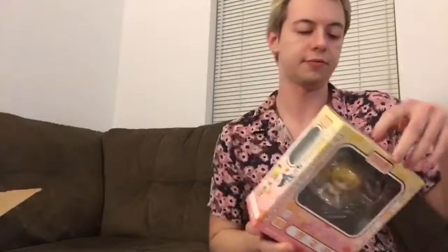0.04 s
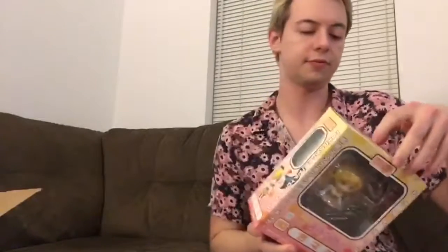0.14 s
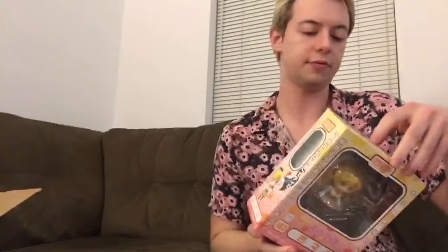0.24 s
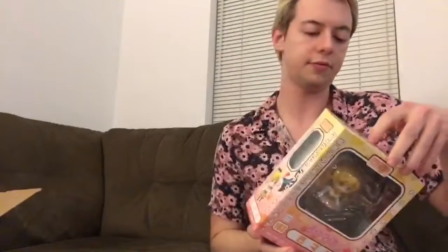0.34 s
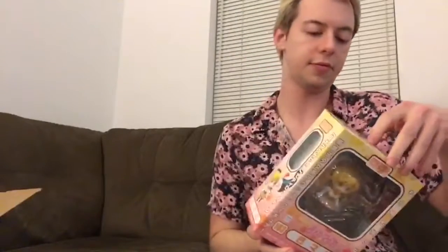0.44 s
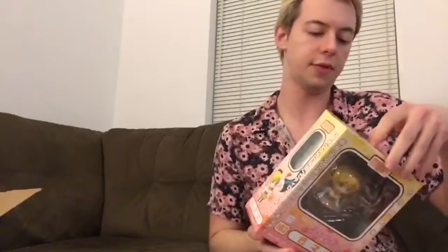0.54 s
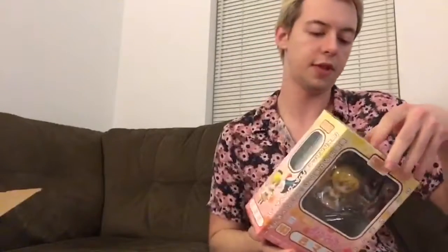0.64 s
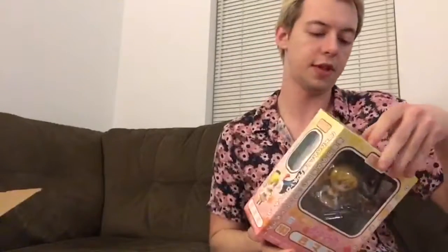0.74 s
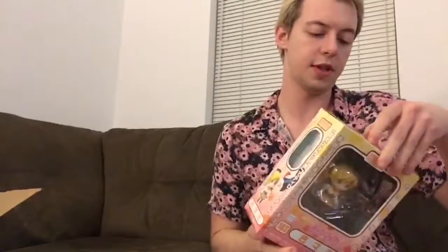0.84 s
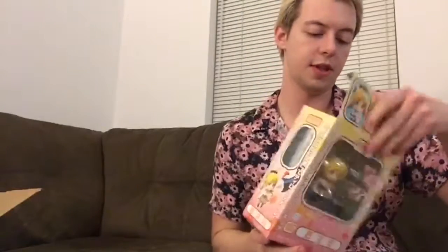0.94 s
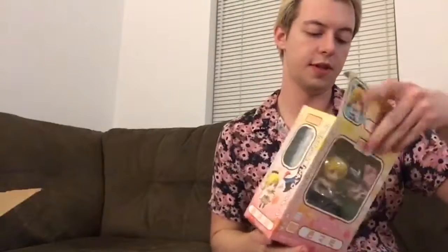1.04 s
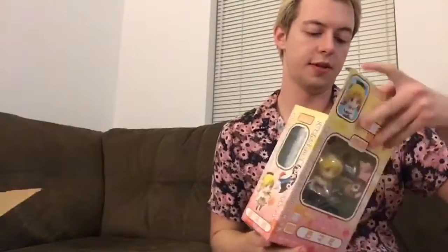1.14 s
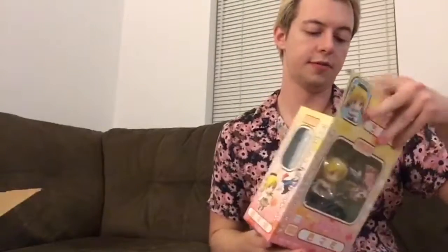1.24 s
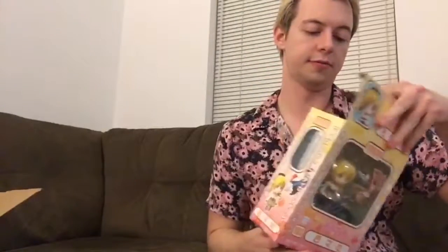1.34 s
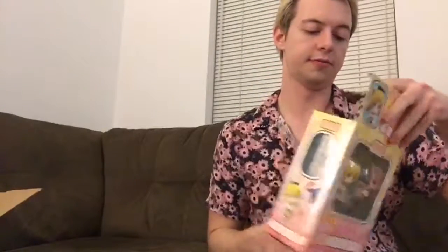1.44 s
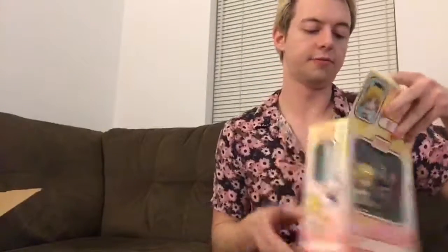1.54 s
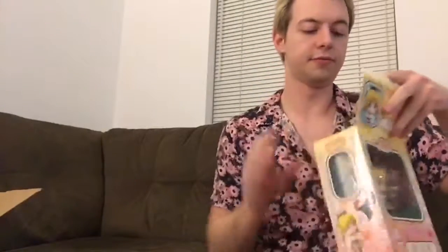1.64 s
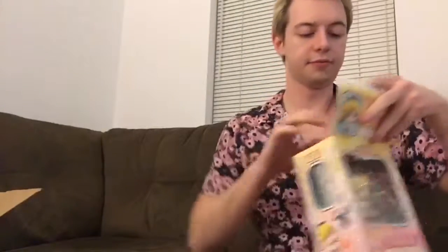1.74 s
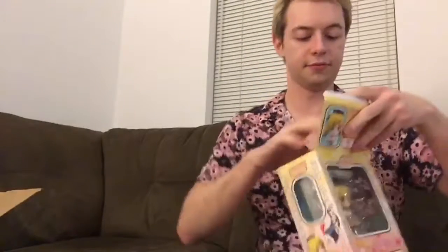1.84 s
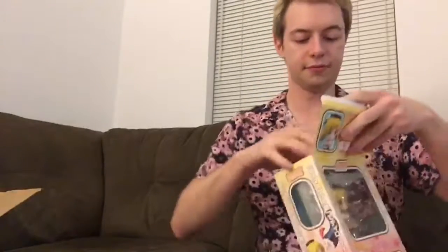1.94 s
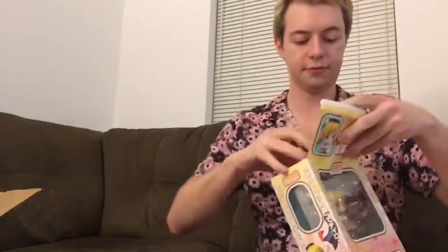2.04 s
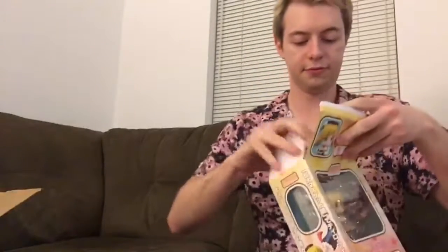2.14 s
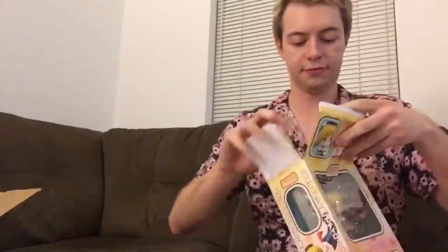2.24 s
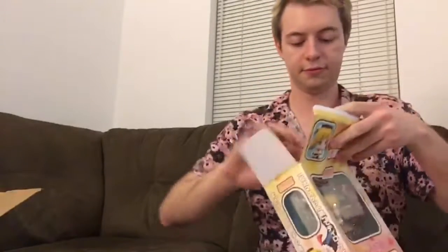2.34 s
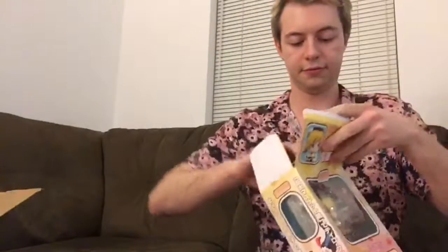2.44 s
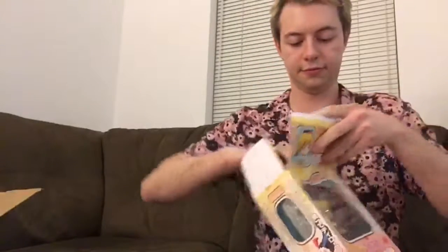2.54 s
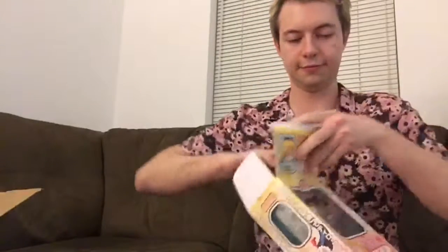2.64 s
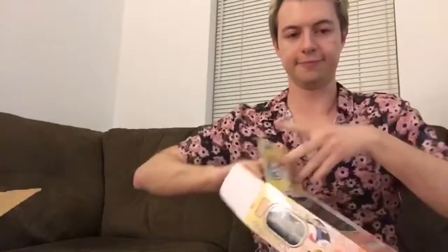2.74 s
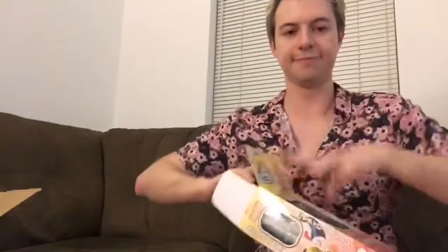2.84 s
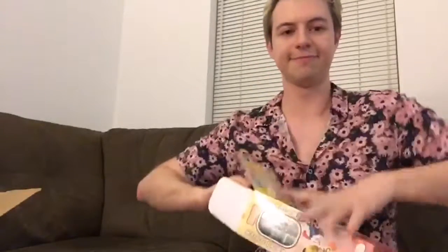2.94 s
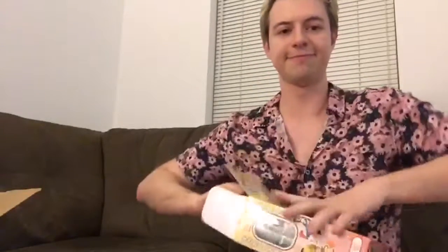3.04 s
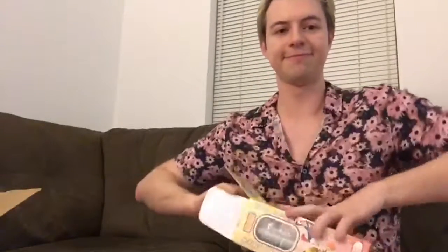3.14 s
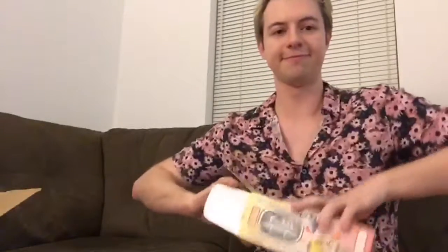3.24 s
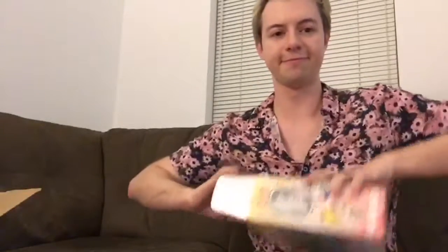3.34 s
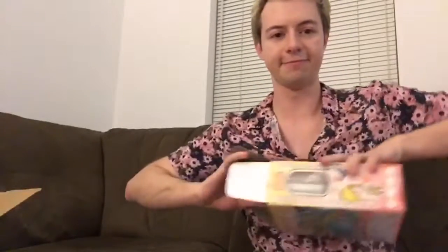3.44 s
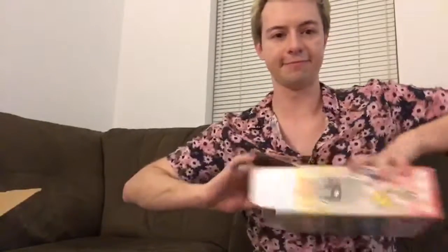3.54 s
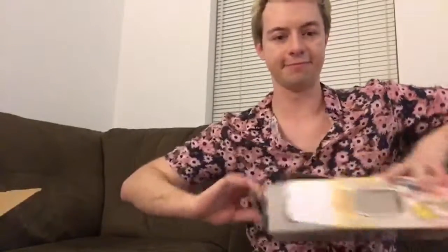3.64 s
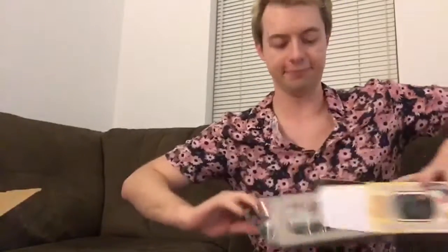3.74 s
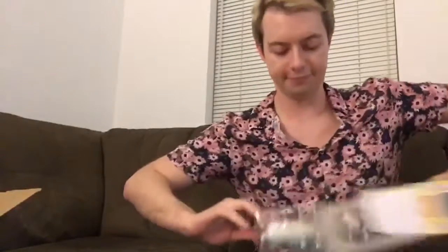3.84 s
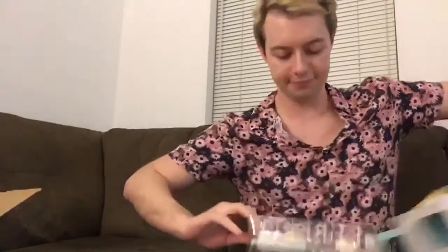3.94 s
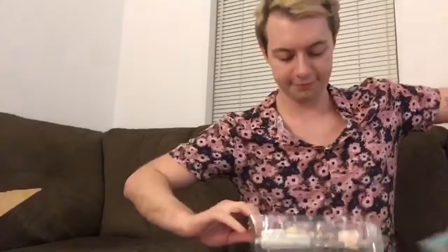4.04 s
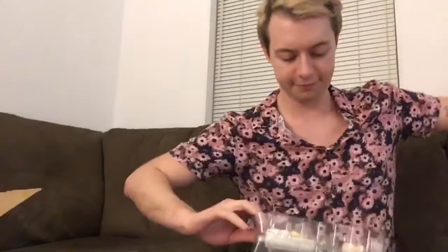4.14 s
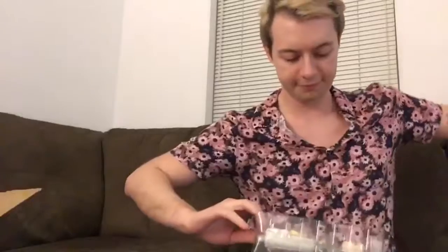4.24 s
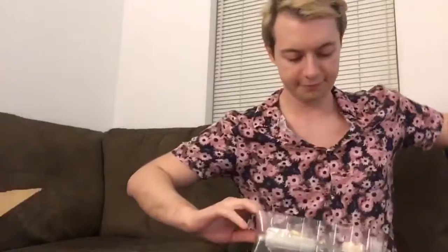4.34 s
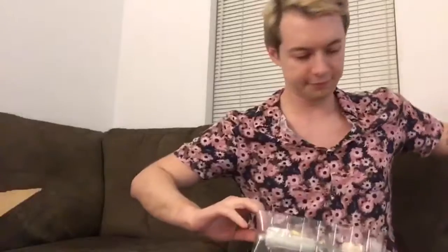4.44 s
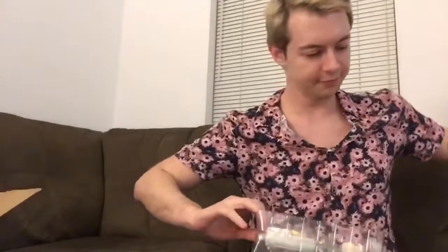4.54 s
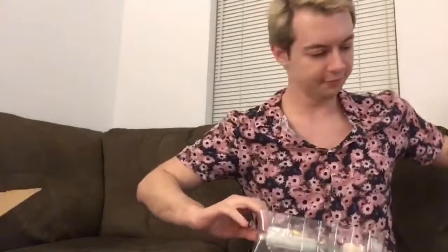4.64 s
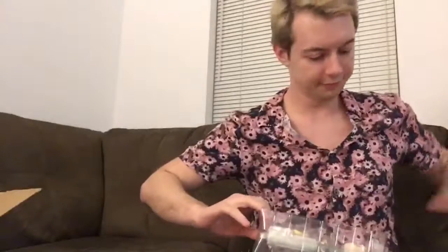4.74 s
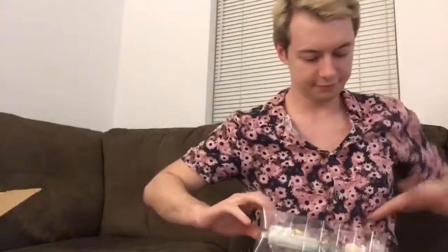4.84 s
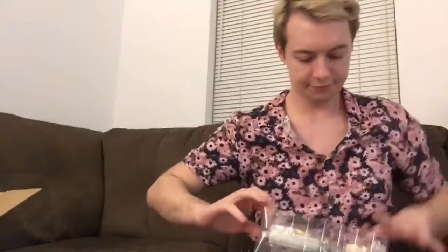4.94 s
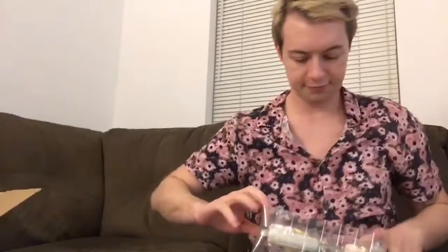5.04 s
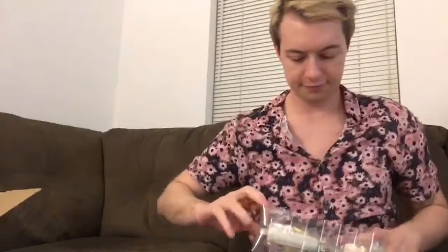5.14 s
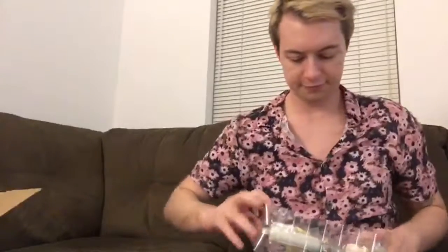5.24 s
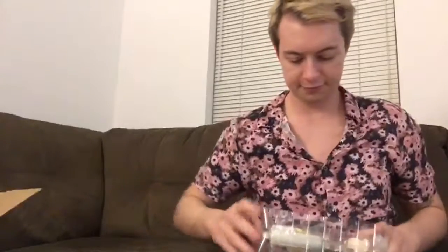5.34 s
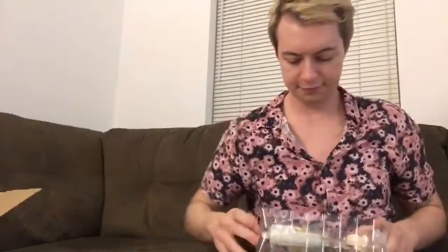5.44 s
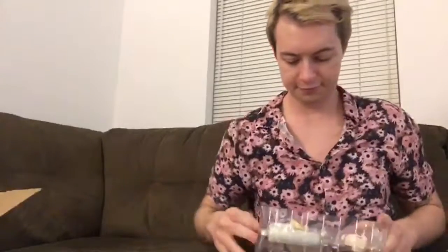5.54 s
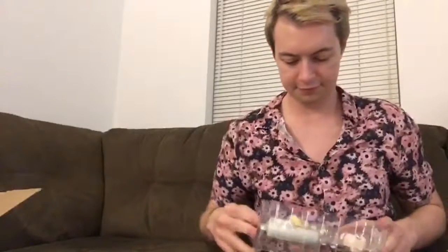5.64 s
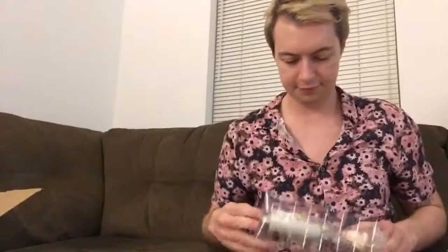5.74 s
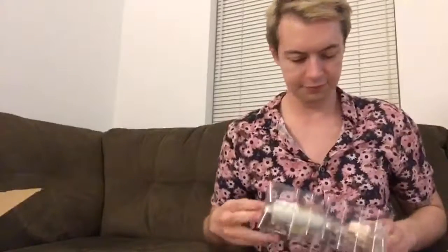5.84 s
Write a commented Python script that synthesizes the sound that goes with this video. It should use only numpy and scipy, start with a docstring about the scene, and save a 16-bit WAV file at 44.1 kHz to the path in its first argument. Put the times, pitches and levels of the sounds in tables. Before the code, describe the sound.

Close, in a small living room with a faint low hum: soft knocks and finger rubs on a cardboard box, a sharp tab pop, plastic crackles and a tiny squeak, a hollow lid pop, then a scraping slide ending in loud plastic snaps. Sparse light crinkles follow.

```python
"""A thin plastic tray is pulled out of a cardboard box opened by hand in a living room: it squeaks, scrapes
along the box and snaps free, then is handled and crackles lightly. Fingers knock and rub on the card, and the
lid pops open. Buckling bursts and stick-slip noise excite resonant sheets; gliding tones make the squeaks,
damped sines the booms, high-passed noise the edges. Sparse echoes make the room, over soft air and a low hum."""
import sys
import numpy as np
from scipy import signal
from scipy.fft import rfft, irfft, next_fast_len
from scipy.io import wavfile

SR = 44100
rng = np.random.default_rng(int(sys.argv[2]) if len(sys.argv) > 2 else 0)


def wav_record(signal):
    """Record a signal, one row per channel, as 16-bit PCM in the file named by sys.argv[1]."""
    frames = np.transpose(np.atleast_2d(signal))
    bounded = np.clip(frames, -1, 1)
    # unit amplitude maps onto the largest positive 16-bit level
    quanta = np.round(bounded * 32767).astype(np.int16)
    wavfile.write(sys.argv[1], SR, quanta)


N = 259214

# Broad spectral colour of the card: f/Hz, relative level/dB
CARD_COLOUR = [(59, -44), (100, -21), (156, -5.5), (381, 1), (608, -3), (836, -2), (1580, 7), (2040, -3.5),
               (3780, -22.5), (5080, -25), (5770, -25.5), (8280, -31.5), (12900, -42), (16000, -46)]
# Broad spectral colour of the plastic when it buckles: f/Hz, relative level/dB
SNAP_COLOUR = [(60, -14.5), (200, -12), (380, -5), (600, -3), (740, -7), (900, -2), (1350, -4),
               (2300, -5.5), (3150, -16.5), (4300, -13.5), (5100, -21), (6700, -13.5), (8300, -22.5),
               (9300, -26), (16000, -38.5)]
# Panel resonances of card and tray: f/Hz, width/Hz, nominal rise above the broad colour/dB
CARD_MODES = [(330, 130, 6), (576, 200, 9.5), (1020, 470, 0.5), (1620, 490, -7.5), (2670, 110, 4.5),
              (4080, 700, 7), (6070, 170, 10)]
TRAY_MODES = [(293, 41, 5), (373, 46, 3.4), (613, 270, 3.6), (1190, 180, 1), (1397, 150, 2.3),
              (1440, 110, 0.89), (2090, 41, 5.1), (2532, 48, 5.8), (2805, 220, 6.4), (3570, 440, 5.8),
              (4420, 300, 4.6), (5840, 530, 4.8), (7100, 250, 2)]


def amp(db):
    """Converts a level in decibels to an amplitude ratio."""
    return 10 ** (np.asarray(db) / 20)


def unit(x):
    """Normalises the mean power, to rms 1."""
    return x / np.sqrt(np.mean(x ** 2) + 1e-20)


def read(points, hz):
    """Interpolates a table linearly on a log-frequency axis."""
    f, value = np.transpose(points)
    return np.interp(np.log(hz + 1), np.log(f + 1), value)


def add(mix, s, sound):
    """Linear superposition: adds a sound to the mix at time s, in place."""
    part = mix[max(round(s * SR), 0):][:len(sound)]
    part += sound[:len(part)]


def drift(rate_hz):
    """Slow random modulation: noise of rms 1 under a Gaussian low-pass."""
    size = next_fast_len(N, True)
    hz = np.fft.rfftfreq(size, 1 / SR)
    spectrum = rfft(rng.standard_normal(size)) * np.exp(-(hz / rate_hz) ** 2)
    return unit(irfft(spectrum, size)[:N])


def room_tone(waver=0.11, phase_drift_rad=0.91):
    """Steady background: shaped air noise plus the amplitude- and phase-wavering hum of an appliance."""
    # Spectrum of the air noise: f/Hz, relative level/dB
    air_colour = [(15, -48), (25, -5.5), (120, 2.5), (141, -9), (166, -8.5), (223, -5.5), (263, -9.5),
                  (607, -23.5), (734, -22), (1400, -27), (2000, -35), (2990, -27), (3340, -33.5),
                  (6050, -36), (16000, -49.5)]
    # Partials of the hum: f/Hz, rms level/dB
    hum_partials = [(58, -66), (88, -63.5), (119.5, -56.5)]
    air_db = -55  # before the high-pass
    size = next_fast_len(N, True)
    t, hz = np.arange(N) / SR, np.fft.rfftfreq(size, 1 / SR)
    spectrum = rfft(rng.standard_normal(size)) * amp(read(air_colour, hz))
    air = unit(irfft(spectrum, size)[:N])
    air = signal.sosfilt(signal.butter(2, 38, "highpass", fs=SR, output="sos"), air)
    hum = np.zeros(N)
    for f, db in hum_partials:
        swell = 1 + waver * drift(3.2)
        hum += amp(db) * unit(swell * np.sin(2 * np.pi * f * t + phase_drift_rad * drift(3)))
    return amp(air_db) * air + hum


def room(x, wet_db=-11, first_echo_s=0.00495, size=256):
    """Reverberation: sparse wall echoes whose bands each decay exponentially at their own rate."""
    # Reverberation time, the time to fall 60 dB: f/Hz, T60/s
    decay_times = [(200, 1), (530, 0.4), (1400, 0.51), (3700, 0.68), (8000, 0.4), (15000, 0.51)]
    echoes_per_s = 2500
    taps = rng.choice([-1., 1.], SR) * (rng.random(SR) < echoes_per_s / SR)
    taps *= np.arange(SR) > first_echo_s * SR
    hz, t, z = signal.stft(taps, SR, nperseg=size)
    fall_db = -60 * t / read(decay_times, hz)[:, None]
    tail = signal.istft(z * amp(fall_db), SR, nperseg=size)[1]
    return x + amp(wet_db) * signal.oaconvolve(x, tail / np.linalg.norm(tail))[:N]


def edges(low_hz=8000, tick_decay_s=0.00086, fade=0.43, flutter_db=2):
    """Thin-rim radiation, treble only: decaying noise when the rim catches, a noise swish when it glides."""
    # Ticks of a sheet's edge catching: t/s, relative level/dB
    catches = [(0.926, -43), (1.537, -39), (2.553, -41), (2.622, -38), (2.683, -41), (2.777, -39.5),
               (3.474, -45), (3.501, -47)]
    # Fast strokes of smooth sheet on sheet: start t/s, end t/s, hiss level before the filter/dB
    glides = [(0.946, 0.98, -59), (1.54, 1.746, -65.5), (1.76, 1.91, -68.5), (2.758, 2.785, -45),
              (3.56, 3.74, -48), (3.731, 4.126, -53), (4.347, 4.493, -62), (5.575, 5.648, -67.5)]
    out, t = np.zeros(N), np.arange(SR // 50) / SR
    for s, db in catches:
        add(out, s, amp(db) * rng.standard_normal(len(t)) * np.exp(-t / tick_decay_s) * 2)
    for start, end, db in glides:
        n = int((end - start) * SR)
        add(out, start, amp(db) * rng.standard_normal(n) * signal.windows.tukey(n, fade))
    treble = signal.butter(2, [low_hz, 15000], "bandpass", fs=SR, output="sos")
    return signal.sosfilt(treble, out * amp(flutter_db * drift(120)))


def booms(rise_s=0.0024):
    """Damped oscillation: low swings of the jolted box walls and the air between them."""
    # Booms of the hollow box: t/s, f/Hz, level before rise and decay/dB, decay time constant/s
    jolts = [(2.789, 181, -26, 0.0066), (2.791, 291.4, -28.5, 0.03), (3.895, 82.4, -30, 0.036),
             (3.96, 88.5, -39, 0.025)]
    out, t = np.zeros(N), np.arange(SR // 2) / SR
    for s, hz, db, decay in jolts:
        envelope = (1 - np.exp(-t / rise_s)) * np.exp(-t / decay)
        add(out, s, amp(db) * np.sin(2 * np.pi * hz * t) * envelope)
    return out


def squeaks(taper=0.31, jitter=0.015, shimmer_db=2, overtone_db=-27):
    """Regular stick-slip: short harmonic tones with an unsteady gliding pitch."""
    # Plastic against card and skin: t/s, length/s, first f/Hz, last f/Hz, rms level/dB
    runs = [(1.338, 0.0058, 3140, 2900, -47), (2.574, 0.012, 1940, 1670, -34),
            (2.582, 0.015, 1615, 1230, -32), (4.801, 0.01, 1420, 1300, -49.5),
            (4.901, 0.0305, 1230, 1303, -53.5), (5.817, 0.022, 2900, 2950, -50),
            (5.854, 0.021, 2570, 3020, -52.5)]
    out, unsteady = np.zeros(N), drift(460)
    for s, length, first_hz, last_hz, db in runs:
        n = int(length * SR)
        wobble = np.roll(unsteady, -int(s * SR))[:n]
        hz = np.linspace(first_hz, last_hz, n) * (1 + jitter * wobble)
        phase = 2 * np.pi * np.cumsum(hz) / SR
        tone = np.sin(phase) + amp(overtone_db) * sum(np.sin(k * phase) for k in range(2, 5))
        shape = amp(shimmer_db * wobble) * signal.windows.tukey(n, taper)
        add(out, s, amp(db) * unit(tone * shape))
    return out


def panel(colour, modes, size=4096):
    """Minimum-phase response of a sheet: resonances stand out of a broad colour, with a causal impulse."""
    hz = np.fft.rfftfreq(size, 1 / SR)
    db = read(colour, hz)
    for f, width, rise in modes:
        db = db + rise / (1 + (2 * (hz - f) / width) ** 2)
    # folding the cepstrum onto positive times makes the phase minimal
    cepstrum = irfft(np.log(amp(db)))
    cepstrum[1:size // 2] *= 2
    cepstrum[size // 2 + 1:] = 0
    return irfft(np.exp(rfft(cepstrum)))


def registers(x):
    """Band-splitting into body (panels ringing), thump (the whole shell) and tick or fizz (the contact)."""
    thump_edge_hz, tick_edge_hz = 750, 3000
    bands = [(2, [thump_edge_hz * 1.25, tick_edge_hz * .8], "bandpass"),
             (4, thump_edge_hz, "lowpass"),
             (5, tick_edge_hz, "highpass")]
    return [signal.sosfilt(signal.butter(*band, fs=SR, output="sos"), x) for band in bands]


def strokes(table):
    """Envelope superposition: body, thump and fizz power of strokes that share one sag and release."""
    # a stroke bites, eases off while it lasts and dies away when the finger lifts
    sag_db_per_s, added_release_db_per_s = 46, 261
    t, power = np.arange(SR // 2) / SR, np.zeros((3, N))
    for start, rise, hold, db, thump_db, fizz_db in table:
        fall_db = sag_db_per_s * np.maximum(t - rise, 0)
        fall_db += added_release_db_per_s * np.maximum(t - rise - hold, 0)
        shape = np.minimum(t / rise, 1) * amp(db - fall_db)
        for register, extra_db in zip(power, (0, thump_db, fizz_db)):
            add(register, start, (shape * amp(extra_db)) ** 2)
    return power


def pull():
    """Sliding-friction envelope: body, thump and fizz power of the tray along the box."""
    # The tray creeps, slides, comes free, and the empty box is swung aside: t/s, relative level/dB
    slide = [(3.27, -55.5), (3.31, -41), (3.52, -41.5), (3.569, -30.5), (3.71, -31.5), (3.78, -36.5),
             (3.85, -29), (3.92, -24.5), (3.955, -33.5), (4.021, -31.5), (4.07, -36.5), (4.13, -53),
             (4.29, -50), (4.441, -45), (4.55, -61), (4.68, -66.5)]
    # thump and fizz follow the scrape; the fizz levels off
    thump_db, fizz_db, fizz_limit_db = -4, -7, -35
    db = np.interp(np.arange(N) / SR, *np.transpose(slide), left=-np.inf, right=-np.inf)
    return amp([db, db + thump_db, np.minimum(db + fizz_db, fizz_limit_db)]) ** 2


def handling():
    """Power addition of grip, strokes and pull: the hands' effort as body, thump and fizz gains."""
    # Finger and flap strokes on card, then finger strokes on the tray: start t/s, rise/s, hold/s,
    # relative level/dB, thump above level/dB, fizz above level/dB
    card_table = [(.91, 0.012, 0.022, -51, 2.5, -0.5), (.95, 0.019, 0.023, -41, -2.5, -7),
                  (.985, 0.014, 0.097, -52, 0.5, -4.5), (1.25, 0.045, 0.17, -62.5, 2.5, -3.5),
                  (1.55, 0.013, .055, -48.5, 3, -4.5), (1.853, .03, 0.042, -46.5, 3.5, -10),
                  (2.02, 0.0085, 0.031, -53.5, 6, -9.5), (2.205, 0.016, .04, -58, 4.5, -11),
                  (2.31, 0.013, 0.022, -54.5, -2, -10)]
    tray_table = [(2.385, 0.044, .02, -45.5, -5, -3.5), (2.485, .015, 0.11, -45.5, -3, -10),
                  (2.59, 0.014, .06, -45, 0, -4.5), (2.675, .015, .045, -41, -5, -16),
                  (2.735, .025, 0.031, -32.5, -5.5, -14), (2.785, .015, .05, -41, 4, -28),
                  (2.965, 0.011, 0.16, -47, -1, -11.5), (3.165, 0.013, 0.084, -47.5, -3, -6.5),
                  (3.8, .035, 0.056, -34.5, 4.5, -17), (4.68, 0.022, 0.058, -58, -14, 0.5),
                  (4.96, 0.018, 0.13, -56, -10, -13), (5.088, 0.026, 0.064, -38.5, -4, -8.5),
                  (5.22, 0.011, 0.11, -50.5, -9, -14), (5.335, 0.048, 0.02, -42, -11, -11.5),
                  (5.425, .025, 0.015, -47.5, -7, -15), (5.505, 0.045, 0.033, -51, -10, -11),
                  (5.58, 0.018, 0.031, -42.5, -16, -8), (5.815, .015, 0.036, -54.5, -11, -11)]
    # The holding hand never rests: body, thump, fizz relative level/dB
    grip_db = (-69, -64.5, -84.5)
    grip = amp(grip_db)[:, None] ** 2
    return np.sqrt(grip + strokes(card_table) + strokes(tray_table) + pull())


def slips(speed, slow_per_s=500, fast_per_s=6000, clump_db=1.5):
    """Stick-slip force: separate unequal slips when slow, merging into a scrape when fast."""
    share = np.minimum((slow_per_s + fast_per_s * speed) / SR, 1)
    spread_db, hiss = 3.7 - .6 * speed, .5
    sizes = amp(spread_db * np.minimum(rng.exponential(1, N), 4)) * rng.choice([-1, 1], N)
    grains = (rng.random(N) < share) * sizes
    # offset the changes of slip rate and size with speed
    grains = unit(grains / np.sqrt(share) / amp(2 * spread_db))
    return unit((grains + hiss * rng.standard_normal(N)) * amp(clump_db * drift(64)))


def resonate(x, hz, width):
    """Heterodyne resonance: a one-pole low-pass turned to follow the curve hz, with gain 1 at its peak."""
    turn = np.exp(2j * np.pi * np.cumsum(hz) / SR)
    r = np.exp(-np.pi * width / SR)
    return 2 * (turn * signal.lfilter([1 - r], [1, -r], x / turn)).real


def flex(force, amount, hz, width, wander):
    """Time-varying resonance: the panel under the fingers shifts in pitch as it bends."""
    return force + amount * resonate(force, hz * np.exp(wander * drift(20)), width)


def rubbing(effort, handover_s=2.2, card_db=-1, tray_db=-1.6, full_speed_db=-31):
    """Friction-driven panels: hands rub the card, then the tray scrapes once the hand is inside the box."""
    # Broad spectral colour of the rubbed tray: f/Hz, relative level/dB
    tray_colour = [(59, -14), (100, -13.5), (234, -2), (373, 2.5), (595, 1), (721, -8), (836, -0.5),
                   (1550, 1.5), (1910, -0.5), (2750, -10.5), (3190, -20.5), (3620, -18.5), (4980, -21),
                   (6990, -21), (16000, -42.5)]
    t = np.arange(N) / SR
    speed = np.minimum(effort[0] / amp(full_speed_db), 1) ** 2
    on_tab = np.interp(t, [.96, 1.02, 1.47, 1.53], [0, 1, 1, 0])  # the small stiff tab rasps higher than the box
    on_card = flex(slips(speed, slow_per_s=1100), amount=2.0 * on_tab, hz=3250, width=430, wander=0.091)
    on_sheet = flex(slips(speed, slow_per_s=600), amount=1.1 * (1 - speed), hz=1430, width=140, wander=.08)
    on_sheet = flex(on_sheet, amount=0.68, hz=5270, width=540, wander=0.13)
    card = signal.oaconvolve(on_card, panel(CARD_COLOUR, CARD_MODES))[:N]
    tray = signal.oaconvolve(on_sheet, panel(tray_colour, TRAY_MODES))[:N]
    on_tray = np.clip((t - handover_s) * 20, 0, 1)  # equal-power crossfade over 50 ms
    card_gain = np.sqrt(1 - on_tray) * amp(card_db)
    tray_gain = np.sqrt(on_tray) * amp(tray_db)
    out = np.zeros(N)
    for on_box, on_plastic, gain in zip(registers(card), registers(tray), effort):
        out += gain * (card_gain * unit(on_box) + tray_gain * unit(on_plastic))
    return out


def blows(table, colour, modes, rattle, ring_db, ring_width, level_db, build, size=4096):
    """Impact excitation: creaks build to one sharp buckle, then scatter; the struck panel gains a resonance."""
    peak = size // 16
    out, t = np.zeros(N), (np.arange(size) - peak) / SR
    for s, body_db, thump_db, tick_db, ring_hz, scatter in table:
        force = rng.standard_normal(size) * np.sqrt(rng.exponential(1, size))
        force *= np.exp(-abs(t) / np.where(t < 0, build * scatter, scatter))
        force *= rattle * np.sqrt(scatter / 0.001) / np.linalg.norm(force)
        force[peak] += 1
        # the place of the blow decides how strongly each mode answers
        struck = [(f, width, rise + 1.5 * rng.standard_normal()) for f, width, rise in modes]
        struck.append((ring_hz, ring_width * np.sqrt(ring_hz), ring_db))
        parts = registers(signal.fftconvolve(force, panel(colour, struck))[:size])
        for part, db in zip(parts, (body_db, thump_db, tick_db)):
            part = part * np.sqrt(.01 * SR) / np.linalg.norm(part)  # energy of 10 ms at rms 1
            add(out, s + t[0], amp(db + level_db) * part)
    return out


def crackles(effort):
    """Random buckling: flexing sheets crackle at random times, as loudly as they are being rubbed."""
    # Crackle above the rubbing: body, thump, tick relative level/dB
    above_rubbing_db = (-8.5, -13.5, -8.5)
    crackles_per_s, spread_db, scatter_s = 22, 3, 0.002
    middle_ring_hz, ring_octaves = 1505, 0.29  # octaves either side
    least_db = -65  # even a still grip makes the sheets tick as if they were rubbed this hard
    rows = []
    for when, strength, place in rng.random((int(crackles_per_s * N / SR), 3)):
        size_db = spread_db * min(-np.log(1 - strength), 4)
        rubbed_db = np.maximum(20 * np.log10(effort[:, int(when * N)]), least_db)
        levels_db = rubbed_db + above_rubbing_db + size_db
        ring_hz = middle_ring_hz * 2 ** (ring_octaves * (2 * place - 1))
        rows.append((when * N / SR, *levels_db, ring_hz, scatter_s))
    return blows(rows, SNAP_COLOUR, TRAY_MODES, rattle=1.5, ring_db=11.5, ring_width=3.6,
                 level_db=-3.5, build=0.13)


def box_knocks():
    """Impacts on card: high damping makes the limp panels ring broadly."""
    # Blows on the box: t/s, body, thump and tick relative level/dB, ringing panel f/Hz, scatter time/s
    knocks = [(0.4235, -44, -44, -63, 536, 0.0077), (0.67, -43, -29.5, -81, 400, 0.0042),
              (0.7827, -52, -59, -59, 520, .006), (0.9194, -46, -38, -47, 377, 0.0063),
              (0.955, -33.5, -60, -34.5, 1650, 0.015), (0.9735, -21.5, -28, -32, 1540, 0.0033),
              (1.3699, -41.5, -41, -49.5, 443, 0.0066), (1.5333, -32, -32.5, -36.5, 1090, 0.0079),
              (1.569, -49, -29, -69, 560, .008), (1.733, -57, -50, -55, 384, 0.008),
              (1.899, -43, -32.5, -49, 333, 0.011), (2.0185, -43, -34, -63, 280, 0.0017),
              (2.1746, -55, -52, -59.5, 302, 0.0064), (2.212, -49, -49.5, -51.5, 610, 0.0055),
              (2.3115, -45, -30, -50.5, 296, 0.0078), (2.33, -38, -57, -45, 1290, .009),
              (2.786, -26, -45, -39, 1380, 0.0023), (2.7915, -21, -20.5, -39, 362, 0.0071)]
    return blows(knocks, CARD_COLOUR, CARD_MODES, rattle=1.5, ring_db=11.0, ring_width=11,
                 level_db=-4, build=0.21)


def tray_snaps():
    """Snap buckling of taut plastic: light damping makes its resonances narrower than the card's."""
    # Snaps of the tray: t/s, body, thump and tick relative level/dB, ringing panel f/Hz, scatter time/s
    snaps = [(2.436, -39.5, -40.5, -51, 1350, 0.022), (2.496, -36, -39.5, -52, 1210, .0025),
             (2.551, -51, -45, -44, 603, 0.0063), (2.62, -56, -46, -43, 1440, .0085),
             (2.665, -33, -61, -37.5, 1730, 0.0038), (2.6714, -18, -38, -22, 1350, .0014),
             (2.7455, -36, -38, -34, 1120, 0.0028), (2.9388, -43.5, -52, -53, 1410, 0.0051),
             (2.9955, -29, -48, -56, 1420, 0.0055), (3.163, -35.5, -45, -46.5, 1550, 0.0038),
             (3.274, -34.5, -60, -51, 1250, 0.0035), (3.386, -39, -44.5, -42, 1290, 0.0088),
             (3.469, -34.5, -48, -61, 2050, 0.0043), (3.5505, -21.5, -36.5, -32, 1240, 0.0038),
             (3.692, -25, -38, -39, 1510, 0.0031), (3.8615, -19, -43, -35, 1770, 0.0042),
             (3.8655, -14.5, -27.5, -23, 1680, 0.007), (3.8942, -19, -25, -24, 2150, 0.0036),
             (3.8985, -12.5, -24, -21.5, 1540, 0.0093), (3.9105, -21, -26, -29.5, 1370, 0.0079),
             (3.9745, -26.5, -57, -35, 1430, 0.0065), (3.996, -20.5, -37, -52, 1580, 0.023),
             (4.2094, -42, -52, -67, 1460, .009), (4.4314, -37.5, -50.5, -62.5, 1550, 0.006),
             (5.0895, -36, -46, -46.5, 1430, 0.013), (5.1189, -36, -42.5, -60, 1260, 0.00082),
             (5.128, -33.5, -55, -46, 1220, 0.006), (5.2117, -39.5, -52, -53, 1690, .004),
             (5.289, -41, -59, -55.5, 1560, 0.0055), (5.5645, -36.5, -54, -61, 1420, 0.0053),
             (5.8125, -42, -75, -36, 3700, 0.0031), (5.817, -40, -73, -56, 1150, 0.0024)]
    return blows(snaps, SNAP_COLOUR, TRAY_MODES, rattle=2.1, ring_db=13.5, ring_width=5.8,
                 level_db=-1, build=0.19)


def scene():
    """Superposition of box and tray sounds in the reverberant room, over its background."""
    effort = handling()
    impacts = box_knocks() + tray_snaps() + crackles(effort)
    contacts = rubbing(effort) + squeaks() + booms() + edges()
    return (room(impacts + contacts) + room_tone())[None]


def record(dry):
    """Band limitation by a linear-phase low-pass at 16 kHz."""
    low_pass = signal.firwin(511, 16000, window=("kaiser", 9), fs=SR)
    return signal.oaconvolve(dry, low_pass[None], "same")


dry = scene()
out = record(dry)
wav_record(out)
```